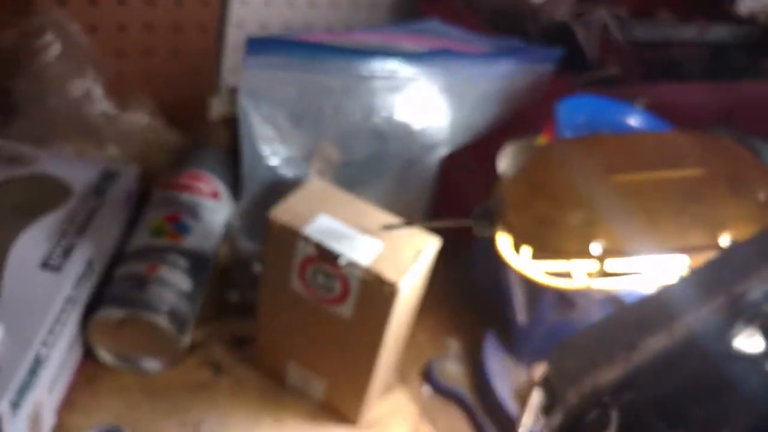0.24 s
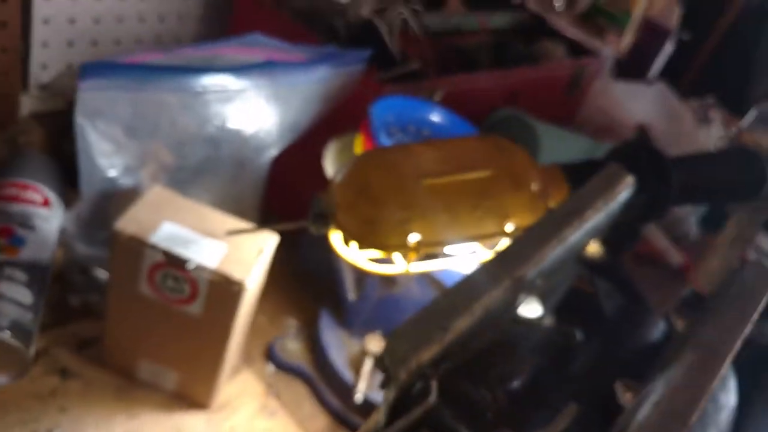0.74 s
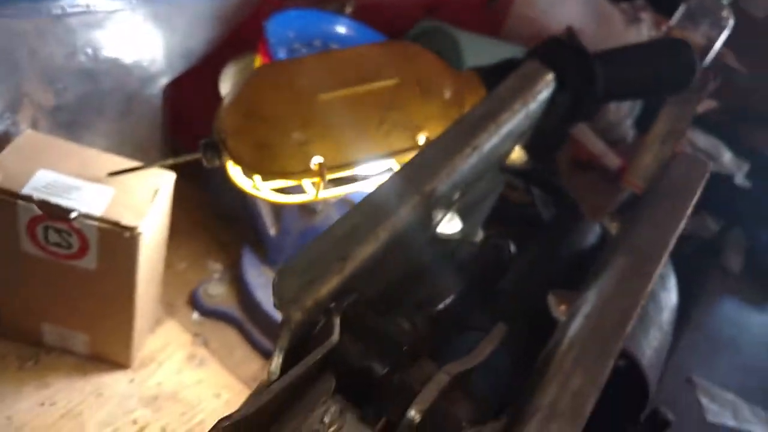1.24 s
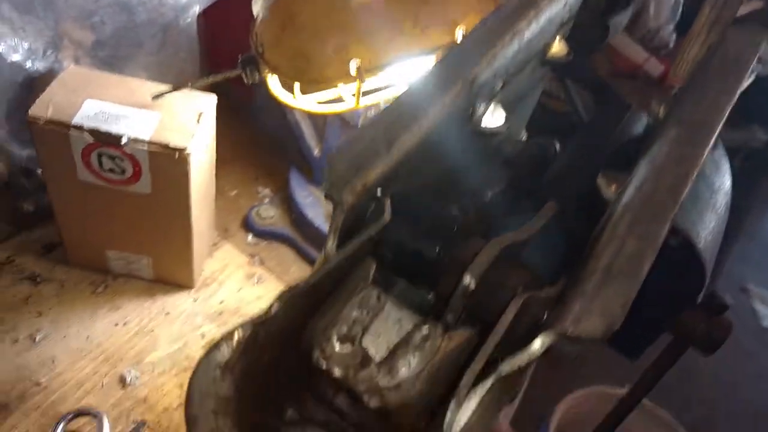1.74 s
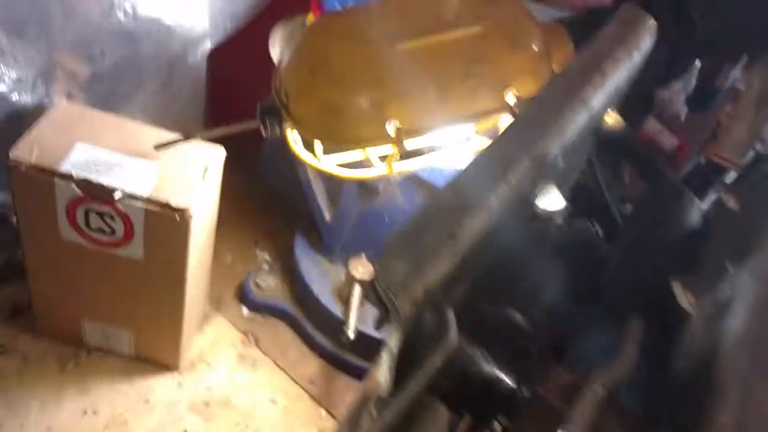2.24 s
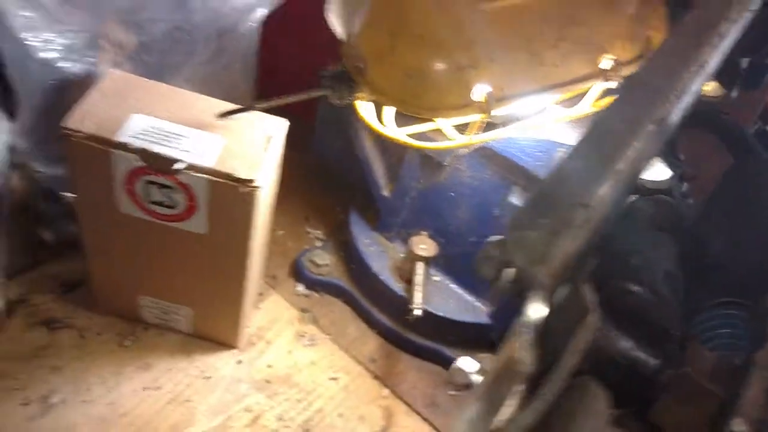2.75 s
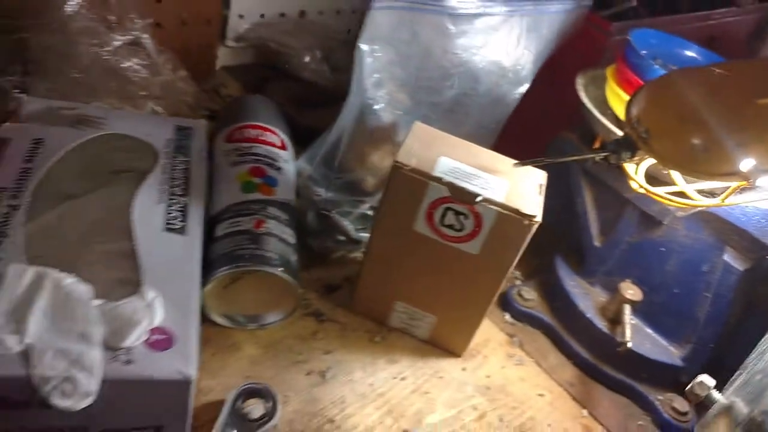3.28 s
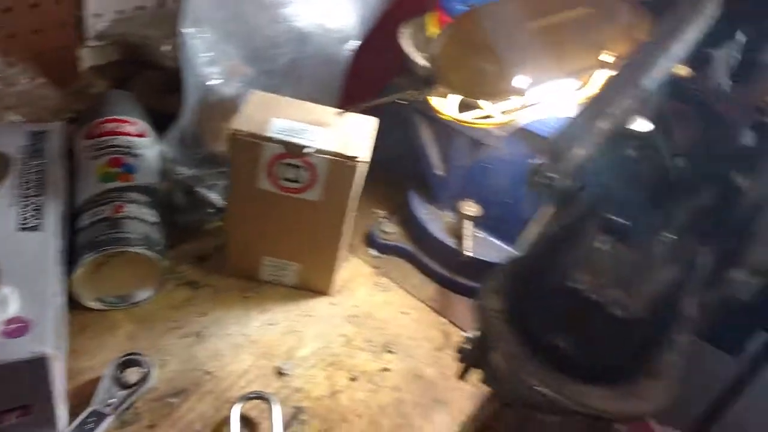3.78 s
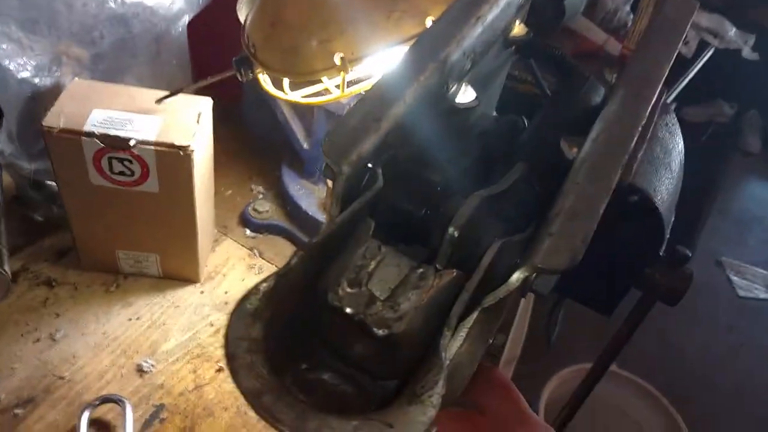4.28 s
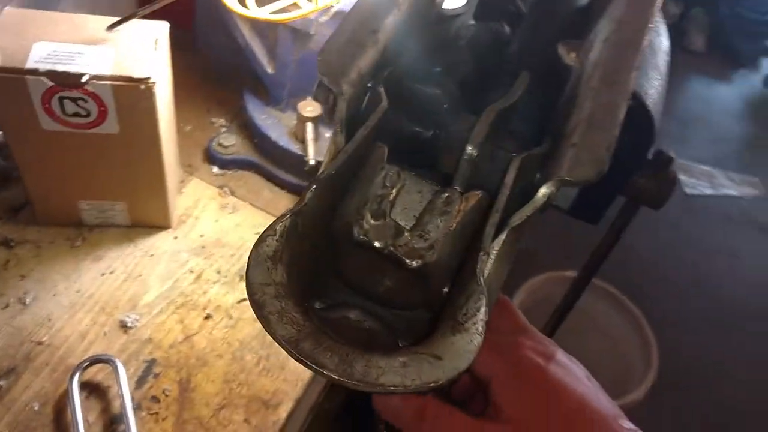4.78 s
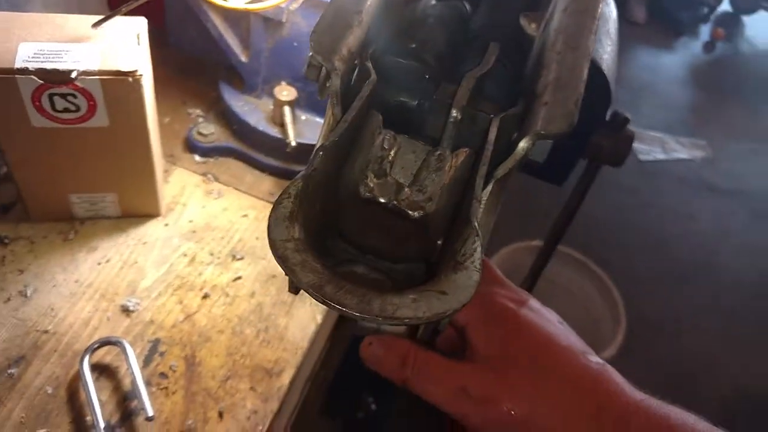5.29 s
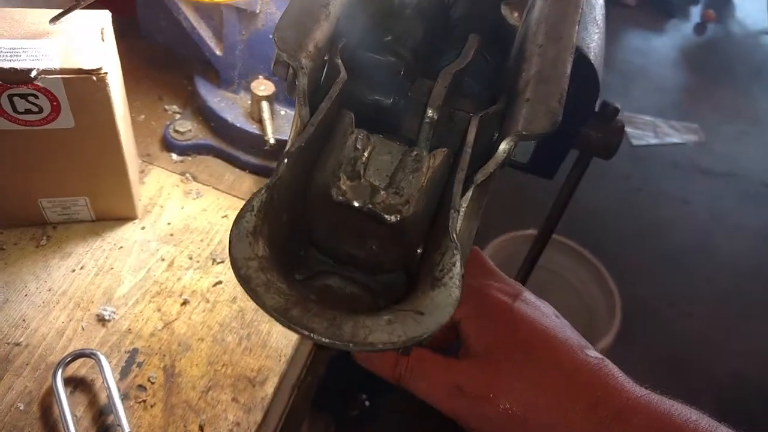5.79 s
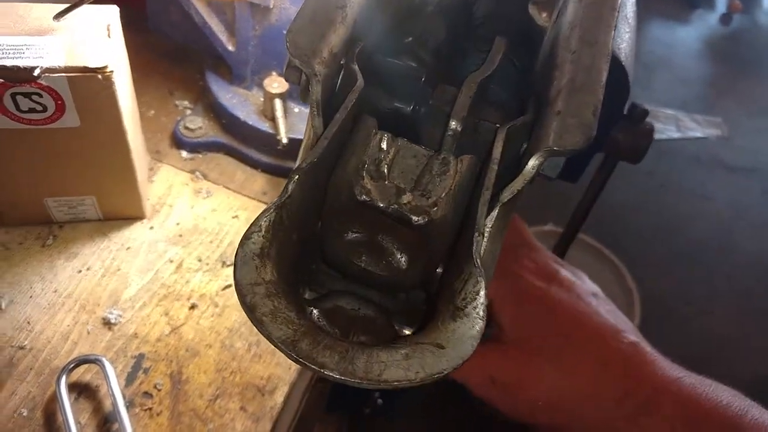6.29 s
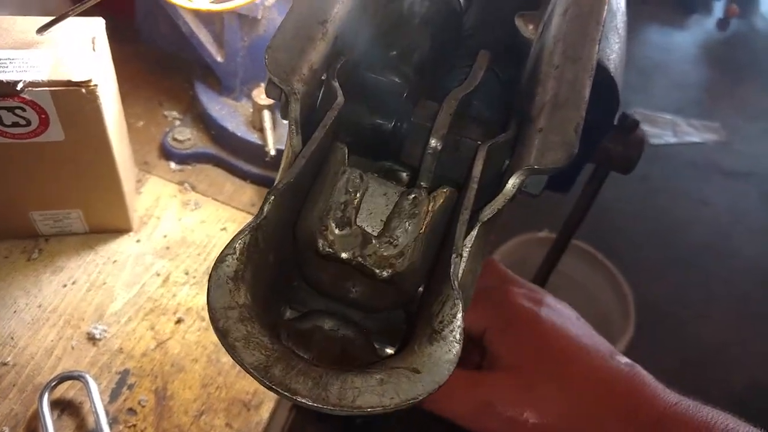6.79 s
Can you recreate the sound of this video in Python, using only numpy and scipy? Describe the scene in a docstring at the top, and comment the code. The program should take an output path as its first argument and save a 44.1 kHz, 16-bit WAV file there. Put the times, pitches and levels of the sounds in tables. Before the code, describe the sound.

A small garage with soft steady hiss and a short scattered room tail. From 0 to 0.6 s shoes scuff gritty concrete in small scrapes, with a brief sleeve rustle. Faint dull knocks at 0.7 and 1.0 s lead to loose, close steel clunks quickening from 1.25 s; the latch clicks free at 1.53 and snaps at 1.59 s, bright and hard, with a faint high spring ring and a dull bench thud. Small clunks and soft pats follow at 2.0 to 2.5 s. Then quiet: a thin squeak near 2.9, another near 3.6, gritty scuffs and cracks from 3.6 to 4.6, cloth rustling around 4.8 s. Dull paired knocks land at 6.0 s, small rattles and ticks at 6.1 to 6.3, a grinding release at 6.35, a lighter bouncing snap at 6.43, and the loudest, sharpest steel clack with a brief metallic ping at 6.95 s.

```python
"""The latch of a steel trailer coupler knocks, grinds over and snaps back on a spring, worked by hand on a bench.
Each blow is a burst of shaped noise that excites decaying modes of the shell and the loose ball clamp.
Shoes scuff the concrete of a small garage as noise gated by grains; a sleeve rustles, thin squeaks swell.
Scattered reflections surround latch and shoes, over a soft steady hiss.
Stereo widening, notches in the centre, gain control and a band limit shape the sum."""
import sys
import numpy as np
from scipy import signal
from scipy.fft import rfft, irfft, next_fast_len
from scipy.io import wavfile
from scipy.ndimage import uniform_filter1d

SR = 44100
rng = np.random.default_rng(int(sys.argv[2]) if len(sys.argv) > 2 else 0)


def transcribe(u):
    """Save the signal u as a 16-bit wav file named by the first command-line argument.

    u: samples, shape (n,) or (channels, n), limited to [-1, 1]; the rate is SR.
    q: integer samples, one column per channel.
    """
    v = np.clip(np.atleast_2d(u).T, -1, 1)
    q = np.round(v * 32767).astype(np.int16)
    wavfile.write(sys.argv[1], SR, q)


N = 310023

# The latch snaps home and its spring sings. Each row: start in seconds, level in dB,
# brightness in dB per octave, second cheek in dB re first, number of bounces, loss per bounce in dB,
# spring pitch in Hz, spring level in dB, spring t60 in seconds.
SNAPS = [(1.5876, -18, 3.5, 3, 1, 0, 6030, -39, 0.39), (6.427, -26.5, 3, 10, 2, 6.5, 6420, -43, 0.45),
         (6.945, -12, 2.5, -8, 0, 0, 6290, -13, 0.068)]
CHEEK_GAP_S = 0.004  # the two cheeks of the latch strike this far apart


def amp(db):
    """Level law: decibels to an amplitude ratio."""
    return 10 ** (np.asarray(db) / 20)


def evened(x):
    """Power normalization: scales to rms 1."""
    return x / np.sqrt(np.mean(x ** 2) + 1e-20)


def read(points, hz):
    """Interpolation on a logarithmic frequency axis."""
    f, value = np.transpose(points)
    return np.interp(np.log(hz + 1), np.log(f + 1), value)


def add(mix, s, sound):
    """Superposition: mixes a stereo sound in at time s."""
    part = mix[:, max(round(s * SR), 0):][:, :sound.shape[1]]
    part += sound[:, :part.shape[1]]


def colour(x, curve_db):
    """Minimum-phase filtering: a folded cepstrum makes the gain curve (dB over Hz) causal."""
    size = 2 * next_fast_len(x.shape[-1] // 2 + 2048)
    cepstrum = irfft(np.log(amp(curve_db(np.fft.rfftfreq(size, 1 / SR)))))
    cepstrum[1:size // 2] *= 2
    cepstrum[size // 2 + 1:] = 0
    response = np.exp(rfft(cepstrum))
    return irfft(rfft(x, size) * response)[..., :x.shape[-1]]


def shaped(x, points):
    """Spectral shaping: gives white noise a spectrum and keeps its power."""
    return colour(x, lambda hz: 20 * np.log10(evened(amp(read(points, hz)))))


def brighten(x, slope_db, knee_hz=1200):
    """Contact stiffness: harder contact tilts the treble up, softer contact down."""
    return colour(x, lambda hz: slope_db * np.log2(np.hypot(1, hz / knee_hz)))


def near_noise(size, apart_hz=2200):
    """Spatial coherence: noise at two microphone ports is alike in the bass, unrelated in the treble."""
    mid, side = rfft(rng.standard_normal((2, size)))
    same = 1 / (1 + (np.fft.rfftfreq(size, 1 / SR) / apart_hz) ** 2)
    mid = mid * np.sqrt((1 + same) / 2)
    side = side * np.sqrt((1 - same) / 2)
    return irfft(np.array([mid + side, mid - side]), size)


def dying(t, t60, rise=0.00089):
    """Damped response: quick rise, then exponential decay."""
    return (1 - np.exp(-t / rise)) * np.exp(-np.log(1000) * t / t60)


def jitter(length, size):
    """Random modulation: smooth chance of rms 1, averaged over size samples."""
    return evened(uniform_filter1d(rng.standard_normal(length), size))


def whistle(size, centre_hz, width_hz):
    """Narrow-band resonance: a cluster of close partials around one pitch."""
    hz = np.fft.rfftfreq(size, 1 / SR)
    band = 1 / (1 + ((hz - centre_hz) / width_hz) ** 4)
    return evened(irfft(rfft(near_noise(size)) * band, size))


def light_taps(rows, part):
    """Selective excitation: light touches wake only one short-lived cluster of modes."""
    out, t = np.zeros((2, N)), np.arange(SR // 8) / SR
    hz, width_hz, t60 = part
    for s, db in rows:
        add(out, s, amp(db) * dying(t, t60, rise=2 / hz) * whistle(len(t), hz, width_hz))
    return out


def latch(spread_db=2, grain_db=3.0, rise=0.00034, softening=0.37, full_t60=0.053, clamp_db=-4):
    """Impact excitation: each blow is a burst of steel-on-steel chatter that rings shell and ball clamp."""
    # Spectrum of the chatter. Each row: frequency in Hz, level in dB.
    chatter_curve = [(60, -26), (190, -4.5), (400, -7), (650, -4.5), (1100, -4), (1600, 2.5), (2200, 2.5),
                     (3400, 1.5), (5000, -3.5), (6500, -1.5), (8500, -6.5), (11200, -21.5), (12900, -16.5),
                     (15500, -43)]
    # Modes of the coupler shell. Each row: frequency in Hz, mean level in dB, t60 in seconds.
    shell_modes = [(287.4, -29, 0.67), (620, -32.5, 0.15), (917, -30, 0.29), (1166, -25.5, 0.14),
                   (1259, -25.5, 0.1), (1485, -13.5, 0.06), (1620, -20, 0.05), (1893, -14.5, 0.067),
                   (2780, -25, 0.096), (3310, -20, 0.08), (3620, -9.5, 0.035), (3870, -13, 0.077),
                   (5690, -18, 0.079), (7700, -25, 0.089), (8300, -21.5, 0.05)]
    crack_db, crack_t60 = 4, 0.0046  # the first instant of contact stands out (dB re chatter, s)
    out, t = np.zeros((2, N)), np.arange(SR // 4) / SR
    mode_hz, mode_db, mode_t60 = np.transpose(shell_modes)
    count = len(mode_hz)
    modes = dying(t, mode_t60[:, None]) * np.exp(2j * np.pi * mode_hz[:, None] * t)
    for s, db, bright, t60, clunk_db in knocks() + releases() + snaps():
        contacts = evened(amp(grain_db * jitter(len(t), size=30)))
        fading = dying(t, t60) + amp(crack_db) * dying(t, crack_t60)
        chatter = shaped(near_noise(len(t), apart_hz=1580) * contacts * fading, chatter_curve)
        # every point of contact favours other modes; high modes reach the two ports out of step
        strength = amp(mode_db + spread_db * rng.standard_normal(count))
        phase = 2 * np.pi * rng.random(count) + rng.standard_normal((2, count)) * mode_hz / 2500
        shell = ((strength * np.exp(1j * phase)) @ modes).imag
        clamp = amp(clamp_db + clunk_db) * clamp_note(t)
        fed = min(t60 / full_t60, 1)  # brief chatter feeds the modes less
        attack = 1 - np.exp(-t / (rise * np.exp(-softening * bright)))  # dull blows build up slowly
        add(out, s, amp(db) * attack * (brighten(chatter + fed * shell, bright) + fed * clamp))
    return out


def clamp_note(t, count=4):
    """Modal cluster: the clamp shifts in its seat, so its few close modes are retuned at each blow."""
    # The loose ball clamp: centre in Hz, scatter to either side in Hz, t60 in seconds.
    hz, scatter_hz, t60 = (845, 52, 0.091)
    mode_hz = hz + scatter_hz * rng.uniform(-1.02, 1, (count, 1))
    return 2 * dying(t, t60, rise=0.0012) * np.sin(2 * np.pi * mode_hz * t).mean(0)


def snaps():
    """Repeated impact: one cheek lands, then the other; any bounces are duller and lose their row's dB."""
    t60, clunk_db = 0.033, -18.5  # chatter (s), clunk before the latch's clamp trim (dB re blow)
    bounce_gap_s, dulling, bounce_t60 = 0.015, 1.24, 0.042  # s, dB per octave per bounce, s
    blows = []
    for s, db, bright, second_db, bounces, loss_db, *_ in SNAPS:
        seated, seated_db = s + CHEEK_GAP_S, db + second_db
        blows.append((s, db, bright, t60, clunk_db))
        blows.append((seated, seated_db, bright, t60, clunk_db))
        for k in range(1, round(bounces) + 1):
            bounce_s, bounce_db = seated + k * bounce_gap_s, seated_db - k * loss_db
            blows.append((bounce_s, bounce_db, bright - k * dulling, bounce_t60, clunk_db))
    return blows


def releases():
    """Stick-slip: the lever takes up its slack, the catch slips harder and harder, both cheeks click free."""
    # The catch grinds over its edge and lets go. Each row: time of letting go in seconds, level in dB,
    # number of slips before it, clunk of the slips in dB re slip, before the latch's clamp trim.
    release_rows = [(1.535, -17.5, 1, 1.5), (6.3523, -20.5, 2, -4)]
    slack_s, taps = 0.075, 6  # span of the soft taps before letting go, and their number
    # dB re release, dB per octave, s, dB re tap before the clamp trim
    slack_db, slack_bright, slack_t60, slack_clunk_db = -25.5, -4.5, 0.1, -16
    slip_gap_s, growth_db, slip_bright, slip_t60 = 0.0095, 10.5, 5.3, 0.074  # s, dB, dB per octave, s
    # letting go is a short, bright click: dB per octave, s, dB re click before the clamp trim
    click_bright, click_t60, click_clunk_db = 6.06, 0.02, -15
    blows = []
    for s, db, slips, clunk_db in release_rows:
        for lead in slack_s * (np.arange(taps) + 0.5 + 0.5 * rng.random(taps)) / taps:
            blows.append((s - lead, db + slack_db, slack_bright, slack_t60, slack_clunk_db))
        for k in range(1, round(slips) + 1):  # counted back from letting go
            blows.append((s - k * slip_gap_s, db - k * growth_db, slip_bright, slip_t60, clunk_db))
        for lag in (0, CHEEK_GAP_S):
            blows.append((s + lag, db, click_bright, click_t60, click_clunk_db))
    return blows


def knocks(neutral_t60=0.039, dull_linger=0.024):
    """Contact duration: play in the linkage knocks, and the duller the contact, the longer it chatters."""
    # Loose knocks of the lever and linkage. Each row: start in seconds, level in dB,
    # brightness in dB per octave, clunk of the clamp in dB re level, before the latch's clamp trim.
    knock_rows = [(0.735, -38.5, -5.5, 5), (0.968, -45, -9.5, 5), (1.258, -31, -7.5, -12.5),
                  (1.345, -44, -2.5, 4), (1.354, -23, -4, -8), (1.392, -37, 1.5, -2.5),
                  (1.422, -33, -6.5, -10), (1.479, -26, 2, 2), (1.505, -27, -5.5, -11),
                  (2.006, -35, -5, -5), (2.037, -35, 0, -9), (2.316, -41.5, -8, -11), (5.985, -26, -7, -12),
                  (5.995, -26.5, -12, -12), (6.108, -38, -8, -18), (6.128, -34.5, -6.5, -11.5),
                  (6.151, -31, -5.5, -23), (6.209, -73, 11, -20), (6.284, -33, -6, -22.5),
                  (6.302, -36.5, -1, -11.5)]
    return [(s, db, bright, neutral_t60 * np.exp(-dull_linger * bright), clunk_db)
            for s, db, bright, clunk_db in knock_rows]


def spring(rattle_db=-33, rattle_t60=0.33):
    """Free vibration: after a snap the coil's crowded modes ring on and the frame shudders on the bench."""
    # Spectrum of the shuddering frame. Each row: frequency in Hz, level in dB.
    rattle_curve = [(60, -11.5), (250, 9.5), (1000, 0.5), (3200, -0.5), (8000, -4.5), (15000, -57)]
    out, t = np.zeros((2, N)), np.arange(SR // 2) / SR
    for s, *_, hz, db, t60 in SNAPS:
        coil = amp(db) * dying(t, t60) * whistle(len(t), hz, width_hz=140)
        shudder = shaped(near_noise(len(t), apart_hz=900), rattle_curve)
        add(out, s, coil + amp(rattle_db) * dying(t, rattle_t60) * shudder)
    return out


def trigger():
    """Small-body resonance: the safety trigger on the lever ticks in one cluster of modes."""
    # Each row: start in seconds, level in dB.
    tick_rows = [(6.144, -40), (6.302, -31)]
    # Its modes: centre in Hz, half-width in Hz, t60 in seconds.
    trigger_modes = (3630, 410, 0.028)
    return light_taps(tick_rows, trigger_modes)


def bench(t60=0.3):
    """Plate response: the wooden bench top answers the rocking coupler with dull thuds."""
    # Bumps of the coupler. Each row: start in seconds, level in dB.
    bump_rows = [(1.48, -38.5), (1.528, -36.5), (1.595, -39.5), (2.051, -49.5), (2.162, -58), (5.992, -52),
                 (6.157, -53), (6.439, -36.5)]
    # Spectrum of the wooden top. Each row: frequency in Hz, level in dB.
    wood_curve = [(70, -17), (155, 5), (330, -4), (700, -9.5), (2000, -31)]
    out, t = np.zeros((2, N)), np.arange(SR // 2) / SR
    for s, db in bump_rows:
        thud = near_noise(len(t), apart_hz=408) * dying(t, t60, rise=0.0012)
        add(out, s, amp(db) * shaped(thud, wood_curve))
    return out


def shoes(grain_db=3.0, slip_db=0.2, coarse_db=-11.5, stop_t60=0.095, crack_t60=0.027):
    """Granular friction: a sole drags over dense grains and stops; weight on it adds a low rumble."""
    # Shoes on concrete. Each row: start in seconds, level in dB, rise in seconds, hold in seconds,
    # brightness in dB per octave, rumble of the weight in dB re level.
    scuff_rows = [(0.0, -56.5, 0.00041, 0.031, 3, -5.5), (0.197, -47, 0.0093, 0.0056, 1, -10),
                  (0.219, -55, 0.03, 0.12, 4, -4.5), (0.288, -40, 0.021, 0.034, -3, -15.5),
                  (0.5246, -34.5, 0.0026, 0.032, 1, -15.5), (3.696, -44, 0.038, 0.0063, 1.5, -37),
                  (3.954, -33, 0.0039, 0.032, 2, -36), (4.224, -50, 0.0036, 0.17, 1, -12.5),
                  (4.476, -37.5, 0.05, 0.028, 2.5, -11)]
    # Single grains crack under a sole. Each row: start in seconds, level in dB.
    crack_rows = [(3.631, -37), (4.239, -31.5)]
    # Spectrum of grit. Each row: frequency in Hz, level in dB.
    grit_curve = [(40, -34), (150, -16), (320, -6), (600, -6), (900, -5.5), (1400, 1), (2200, 1.5),
                  (3500, 6), (5000, 0.5), (6200, 5), (9000, -3.5), (15500, -12.5)]
    # Rumble of a loaded sole. Each row: frequency in Hz, level in dB.
    sole_curve = [(50, -18), (160, -4.5), (450, 3.5), (1500, -13), (6000, -61)]
    out, t = np.zeros((2, N)), np.arange(SR // 2) / SR
    for s, db, rise, hold, bright, weight_db in scuff_rows:
        stopping = np.exp(-np.log(1000) * np.maximum(t - rise - hold, 0) / stop_t60)
        stroke = np.minimum(t / rise, 1) * stopping
        fine = evened(amp(grain_db * jitter(len(t), size=24) + slip_db * jitter(len(t), size=500)))
        grains = evened(fine + amp(coarse_db) * coarse_grains(len(t)))
        drag = near_noise(len(t), apart_hz=1280) * grains * stroke
        rumble = amp(weight_db) * shaped(near_noise(len(t), apart_hz=400) * stroke, sole_curve)
        add(out, s, amp(db) * (brighten(shaped(drag, grit_curve), bright) + rumble))
    for s, db in crack_rows:
        add(out, s, amp(db) * shaped(near_noise(len(t)) * dying(t, crack_t60), grit_curve))
    return out


def coarse_grains(length, per_s=260):
    """Random impulses: bigger grains tumble in sparse, very short crunches of uneven size."""
    hits = (rng.random(length) < per_s / SR) * rng.uniform(0.66, 1, length)
    return evened(uniform_filter1d(hits, size=24))


def sleeve(stir_db=-71.5, crumple_db=2.5, uneven_db=1.5):
    """Modulated friction noise: each move of the arm swells and fades; cloth rubs in uneven catches."""
    # Separate rustles. Each row: time of the peak in seconds, length in seconds, level in dB.
    rustle_rows = [(0.38, 0.24, -51.5), (0.893, 0.47, -65), (2.09, 0.37, -63), (2.646, 0.18, -63.5),
                   (4.396, 1, -65), (4.8, 0.49, -52.5), (5.45, 0.19, -67.5), (6.08, 0.27, -61.5)]
    # Spectrum of cloth. Each row: frequency in Hz, level in dB.
    cloth_curve = [(50, -33), (200, -7.5), (420, 2.5), (700, -11.5), (1300, -16), (2500, -34.5),
                   (12000, -73)]
    t = np.arange(N) / SR
    motion = np.full(N, amp(stir_db))  # the arm is never quite still
    for s, length, db in rustle_rows:
        motion += amp(db) * np.cos(np.pi * np.clip((t - s) / length, -0.5, 0.5)) ** 2
    catches = amp(crumple_db * jitter(N, size=600) + uneven_db * jitter(N, size=2500))
    return shaped(near_noise(N, apart_hz=315) * motion * catches, cloth_curve)


def pats():
    """Damped resonance: soft pats of handling in one low, broad band."""
    # Each row: start in seconds, level in dB.
    pat_rows = [(2.105, -53), (2.32, -44.5), (2.493, -56), (3.24, -51), (4.312, -50), (4.348, -52),
                (6.087, -50.5)]
    # The band: centre in Hz, half-width in Hz, t60 in seconds.
    pat_band = (480, 440, 0.055)
    return light_taps(pat_rows, pat_band)


def squeaks():
    """Narrow-band noise: thin, fuzzy squeaks swell and fade."""
    # Each row: start in seconds, length in seconds, pitch in Hz, level in dB.
    squeak_rows = [(1.226, 0.11, 7300, -58), (2.872, 0.14, 7300, -53), (3.575, 0.16, 6170, -49.5),
                   (6.806, 0.15, 3250, -63.5)]
    out = np.zeros((2, N))
    for s, length, hz, db in squeak_rows:
        size = int(length * SR)
        add(out, s, amp(db) * np.hanning(size) * whistle(size, hz, width_hz=500))
    return out


def hiss(level_db=-56.5):
    """Stationary noise: steady room air and microphone hiss, unrelated at the two sides."""
    # Spectrum of the hiss. Each row: frequency in Hz, level in dB.
    hiss_curve = [(25, -26), (60, -5), (130, -3), (330, 0), (700, -11.5), (1100, -12.5), (2000, -11.5),
                  (3000, -13), (3700, -3), (4600, -10.5), (6000, -13), (7600, -11), (10000, -17.5),
                  (15500, -23)]
    return amp(level_db) * shaped(rng.standard_normal((2, N)), hiss_curve)


def garage(x, gap=0.0017, build=0.0017):
    """Reverberation: scattered reflections, each band dying at its own speed (gap and build in s)."""
    # Decay of the room. Each row: frequency in Hz, t60 in seconds.
    decay_curve = [(150, 0.72), (600, 0.63), (2000, 0.41), (6000, 0.48), (14000, 0.34)]
    taps = rng.standard_normal((2, SR // 2)) * (rng.random((2, SR // 2)) < 1 / 10)
    hz, t, z = signal.stft(taps, SR, nperseg=256)
    fading = dying(np.maximum(t - gap, 0), read(decay_curve, hz)[:, None], rise=build)
    tail = signal.istft(z * fading, SR, nperseg=256)[1]
    return signal.fftconvolve(x, tail / np.linalg.norm(tail[0]), axes=1)[:, :N]


def scene(latch_wet_db=-22, shoes_wet_db=-5):
    """Direct-to-reverberant ratio: the latch is close and dry; the feet are farther off and wetter."""
    # Balance of the near sounds. Each row: frequency in Hz, left minus right in dB.
    balance_curve = [(200, 0), (700, 4), (1500, 6), (3500, -1), (6000, -4), (12000, -3)]
    metal = latch() + spring() + bench() + trigger()
    feet = shoes()
    near = metal + feet + garage(amp(latch_wet_db) * metal + amp(shoes_wet_db) * feet)
    left = colour(near[0], lambda hz: read(balance_curve, hz) / 2)
    right = colour(near[1], lambda hz: -read(balance_curve, hz) / 2)
    return np.array([left, right]) + pats() + sleeve() + squeaks() + hiss()


def widen(x, delay_s=19.6 / SR):
    """Comb filtering: each side gets a late, inverted share of the other, combing centre and sides in turn."""
    # Each row: frequency in Hz, share of the other side as an amplitude ratio.
    crossfeed_curve = [(60, 0.61), (250, 0.44), (1100, 0.98), (2250, 0.61), (3400, 0.4), (4500, 0.44),
                       (6500, 0.05), (12000, 0.14)]
    size = N + SR // 10
    hz = np.fft.rfftfreq(size, 1 / SR)
    z = rfft(x, size)
    share = np.clip(read(crossfeed_curve, hz), 0, 1)
    return irfft(z - share * np.exp(-2j * np.pi * hz * delay_s) * z[::-1], size)[:, :N]


def hollow(x):
    """Destructive interference: narrow bands cancel in the stereo centre and stay at its sides."""
    # Where the two ports cancel. Each row: centre in Hz, half-width in Hz, gain in dB.
    notch_rows = [(2296, 198, -16), (4530, 66, -4)]
    size = N + SR // 10
    hz = np.fft.rfftfreq(size, 1 / SR)
    dip_db = sum(db * np.exp(-abs((hz - f) / width) ** 4) for f, width, db in notch_rows)
    change = irfft(rfft(x.mean(0), size) * (amp(dip_db) - 1), size)
    return x + change[:N]


def gain_control(x, threshold_db=-27, squeeze=0.32, fall_db=9):
    """Peak-hold compression: loud sounds pull the gain down at once; it creeps back at a steady rate."""
    power_db = 10 * np.log10(abs(uniform_filter1d((x ** 2).mean(0), size=200)) + 1e-12)
    creep = fall_db * np.arange(N) / SR  # the held level falls by fall_db each second
    held_db = np.maximum.accumulate(power_db + creep) - creep
    over_db = np.maximum(held_db - threshold_db, 0)
    return x / amp(squeeze * uniform_filter1d(over_db, size=100))


def record(dry, edge_hz=15800):
    """Signal chain: widening, centre notches, gain control and the band limit."""
    low_pass = signal.firwin(401, edge_hz, window=("kaiser", 8), fs=SR)
    return signal.oaconvolve(gain_control(hollow(widen(dry))), low_pass[None], "same")


dry = scene()
out = record(dry)
transcribe(out)
```